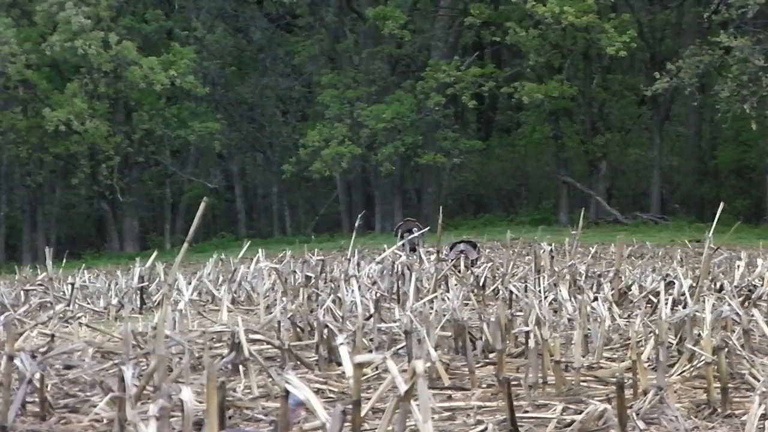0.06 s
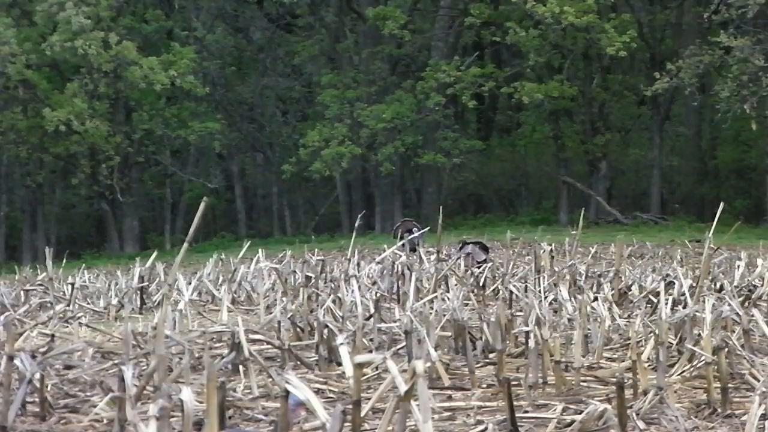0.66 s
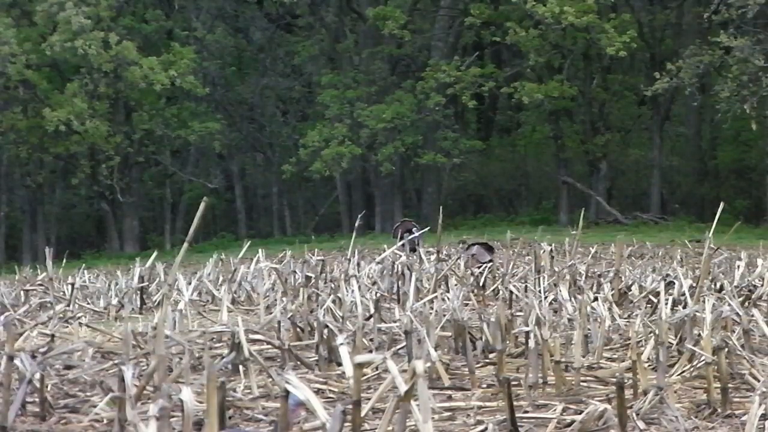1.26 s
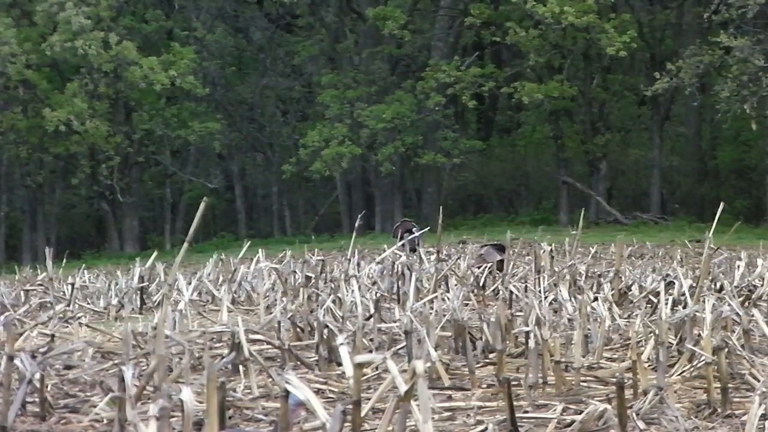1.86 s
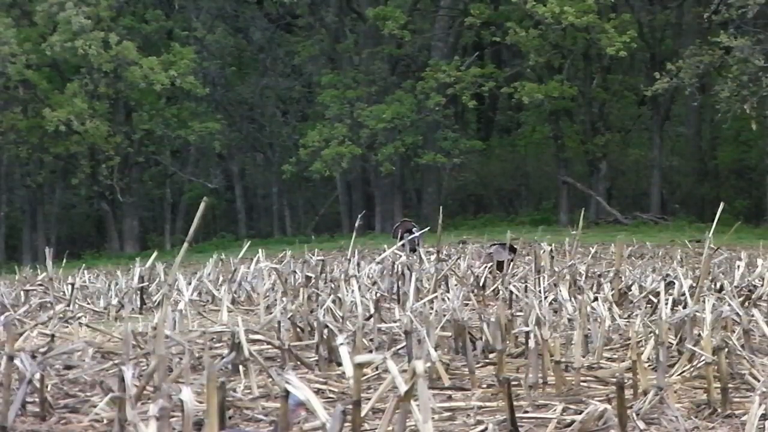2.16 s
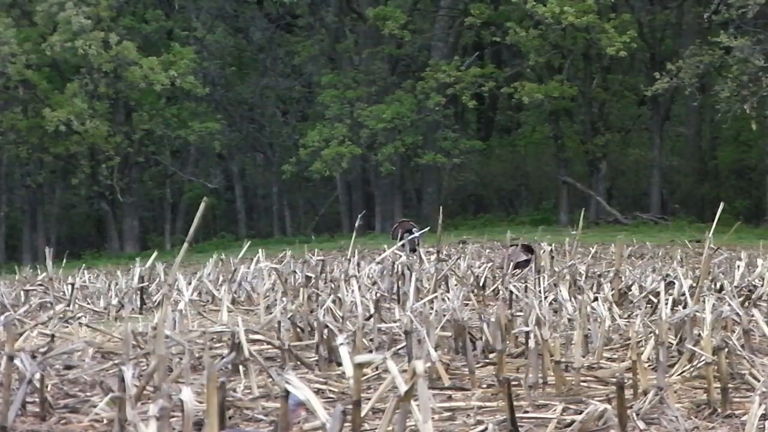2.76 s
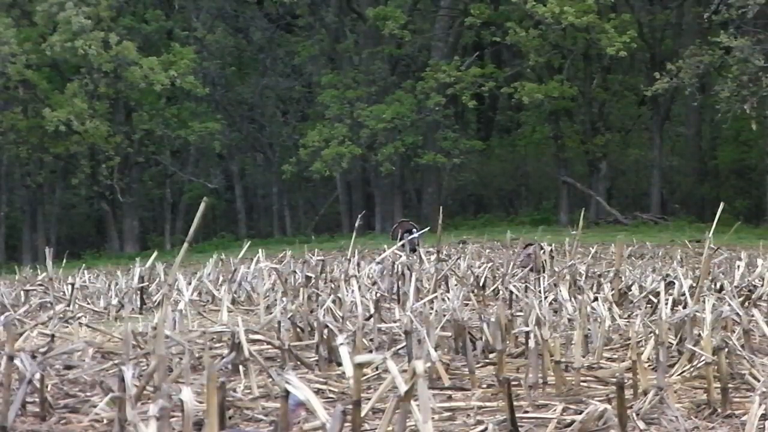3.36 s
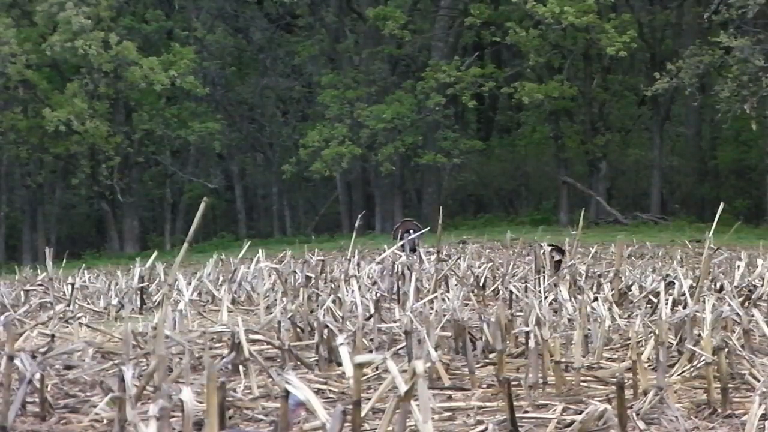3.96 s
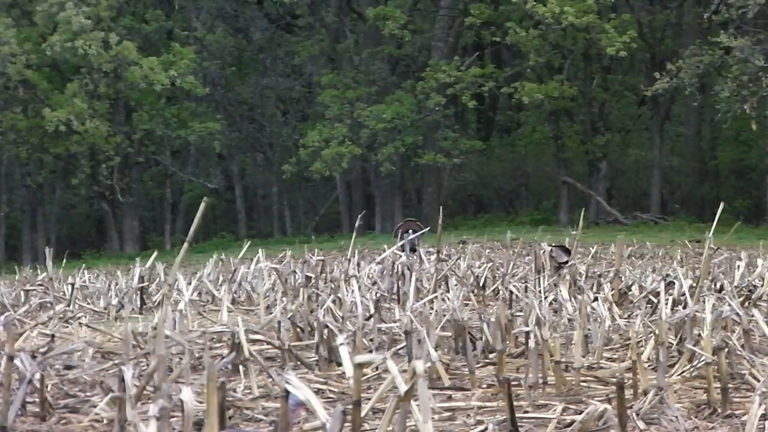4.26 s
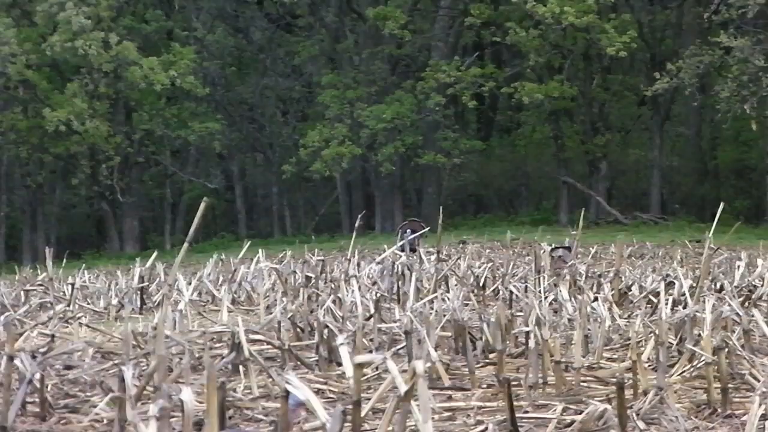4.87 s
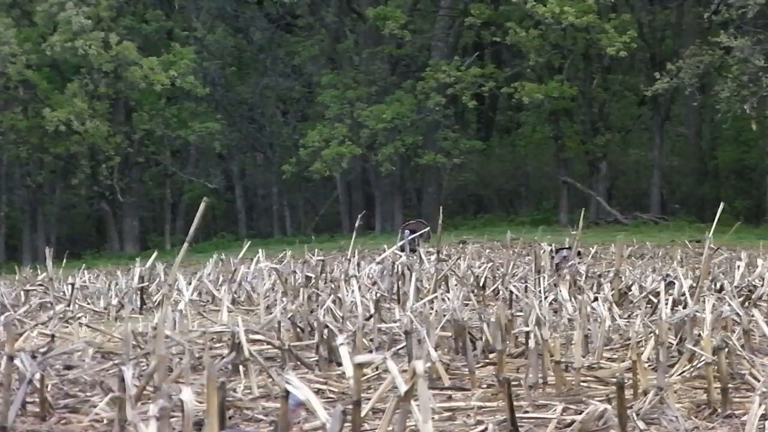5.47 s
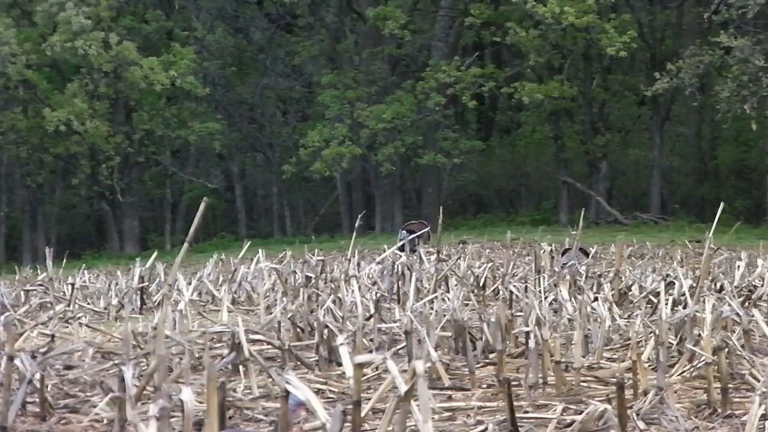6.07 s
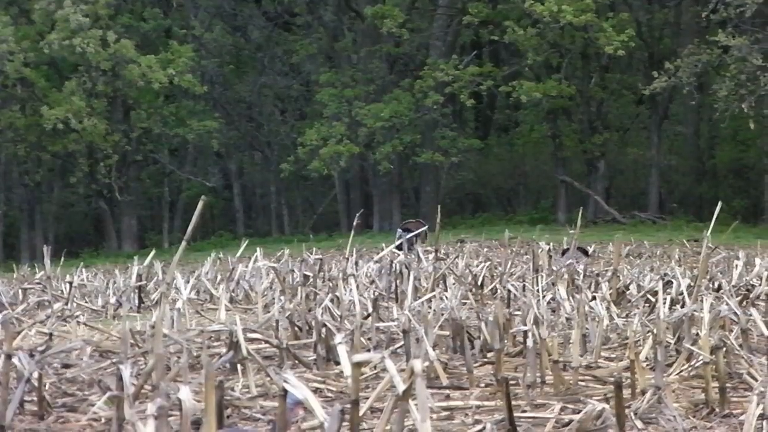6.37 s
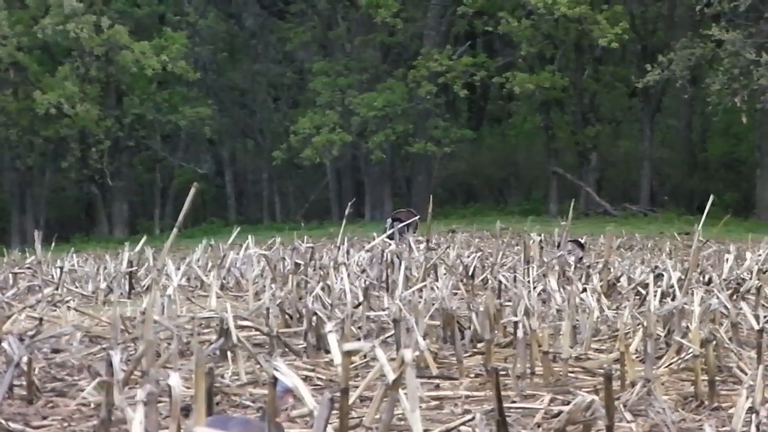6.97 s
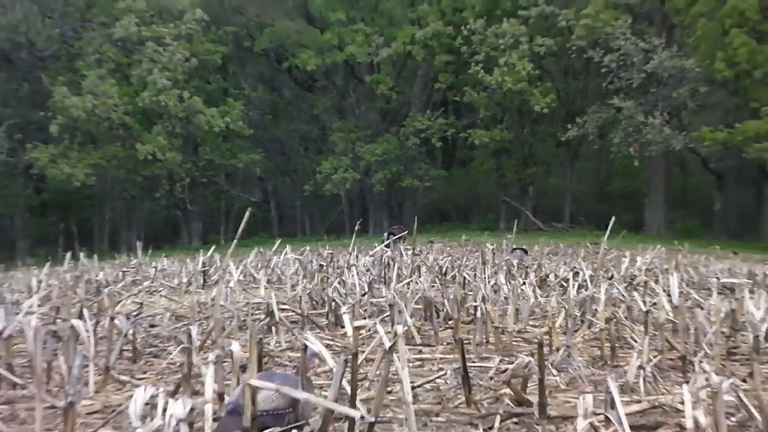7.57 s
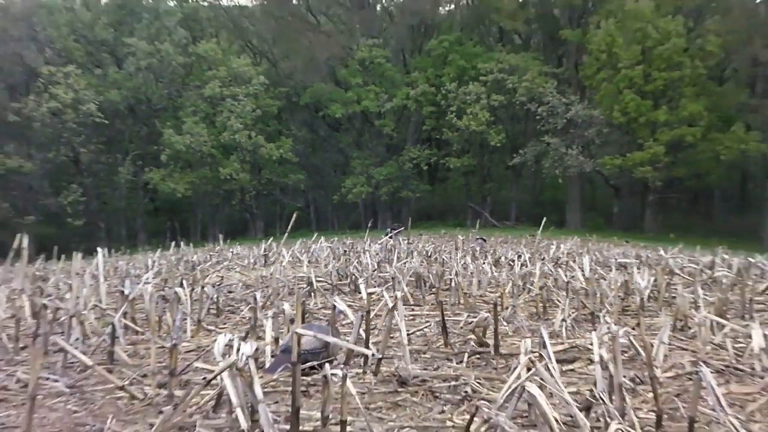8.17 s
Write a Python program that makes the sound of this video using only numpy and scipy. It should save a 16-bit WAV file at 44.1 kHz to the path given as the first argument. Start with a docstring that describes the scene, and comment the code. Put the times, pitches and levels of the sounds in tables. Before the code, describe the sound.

A steady low rumble, distant engine drone and hiss with a faint high whine fill an open field beside a wood. One bird gives a downward whistle and a quick trill, then another sings a run of upward slurs, getting shorter and faster. Fingers briefly tap the camera close to the microphone before the first bird's whistle and trill return. Both songs carry a light woodland echo, with faint peeps from deeper in the trees.

```python
"""A bird at the edge of a wood sings a falling note and a fast trill, twice, heard from a stubble field
in spring. In between, a second bird whistles rising slurs that speed up like a bouncing ball.
The trees echo both, and other birds call from deeper in. Distant engines drone under the rumble of
the countryside. Right at the microphone, the camera hisses, whines and clicks under a finger."""
import sys
import numpy as np
from scipy import signal
from scipy.fft import rfft, irfft
from scipy.io import wavfile
from scipy.ndimage import uniform_filter1d

SR = 44100
rng = np.random.default_rng(int(sys.argv[2]) if len(sys.argv) > 2 else 0)


def bounce(signal):
    """Save signal as a 16-bit WAV file at the path given by the first command-line argument."""
    frames = np.transpose(np.atleast_2d(signal))
    limited = np.clip(frames, -1, 1)
    pcm = np.round(limited * 32767).astype(np.int16)
    wavfile.write(sys.argv[1], SR, pcm)


N = 361911
TIME = np.arange(N) / SR


def from_db(db):
    """Decibels to gain."""
    return 10 ** (np.asarray(db) / 20)


def unit_rms(x):
    """Scale to unit power."""
    return x / np.sqrt(np.mean(x ** 2) + 1e-20)


def ages(length_s):
    """The time in seconds of each sample of a sound."""
    return np.arange(max(int(length_s * SR), 2)) / SR


def envelope(age, attack_s, release_s, depth_db=20):
    """Attack, hold and release of a note, in dB relative to its peak."""
    rising = np.clip(1 - age / attack_s, 0, 1)
    falling = np.clip(1 - (age[-1] - age) / release_s, 0, 1)
    return -depth_db * (rising ** 2 + falling ** 2)


def s_curve(at, centre, width):
    """A smooth step from 0 to 1."""
    return .5 + .5 * np.tanh((at - centre) / width)


def drift(rate_hz):
    """A slow random wander, rms 1."""
    hz = np.arange(N // 2 + 1) * SR / N
    return unit_rms(irfft(rfft(rng.standard_normal(N)) / (1 + (hz / rate_hz) ** 2), N))


def coloured_noise(spectrum):
    """Steady noise of a given colour, rms 1."""
    hz, db = np.transpose(spectrum)
    bins = np.arange(1, N // 2 + 2) * SR / N
    gain = from_db(np.interp(np.log(bins), np.log(hz), db)) * np.minimum(bins / hz[0], 1) ** 2
    return unit_rms(irfft(rfft(rng.standard_normal(N)) * gain, N))


def sine(hz):
    """A pure tone that follows a pitch track."""
    return np.sin(2 * np.pi * (np.cumsum(hz) / SR + rng.random()))


def add(track, start, sound):
    """Mix a sound into a track at a time in seconds."""
    at = max(int(start * SR), 0)
    track[at:at + len(sound)] += sound[:max(N - at, 0)]


# The low end out on the open field. Each row: frequency in Hz, relative spectral level in dB.
RUMBLE_SPECTRUM = [(12, -28), (25, -17), (38, -11), (50, -13), (60, 2.5), (68, 3.5), (80, -0.5), (90, 4),
                   (102, 4.5), (125, -1), (155, -4), (180, -10.5), (250, -16.5), (390, -48)]
# Its slow rise and fall. Each row: time in seconds, gain in dB.
RUMBLE_SWELL = [(0, -1.5), (1.3, -0.5), (2.2, 0), (4.3, 0), (5.6, -0.5), (6.6, -1), (8.2, -1)]
def rumble(level_db=-45.5):
    """The countryside all around: low noise that swells a little and sinks."""
    swell_db = np.interp(TIME, *np.transpose(RUMBLE_SWELL))
    return from_db(level_db + swell_db) * coloured_noise(RUMBLE_SPECTRUM)


# Engines a long way off. Each row: start and end in seconds, first pitch and the pitch it tends to in Hz,
# settling time in seconds, time in seconds from which the drone's level falls away (may lie before
# its start), reference level in dB.
ENGINES = [(1.2, 4.7, 118.4, 96.8, 4.5, 0.76, -45.5), (2.1, 8.2, 91.4, 103.1, 1.6, 7.14, -43)]
def engines(waver=.0063, flutter_db=2.5, fade_db_per_s=3.5):
    """Only the firing tones carry this far; each eases towards a steady speed as it fades in and out."""
    out = np.zeros(N)
    for start, end, first_hz, last_hz, settle_s, fade_from_s, reference_db in ENGINES:
        age = ages(end - start)
        hz = last_hz + (first_hz - last_hz) * np.exp(-age / settle_s)
        hz *= 1 + waver * drift(rate_hz=2.5)[:len(age)]
        db = reference_db - fade_db_per_s * np.abs(start + age - fade_from_s)
        db += envelope(age, attack_s=.3, release_s=.314)
        db -= flutter_db * drift(rate_hz=2.5)[:len(age)]
        add(out, start, np.sqrt(2) * sine(hz) * from_db(db))
    return out


# The noise floor at the microphone. Each row: frequency in Hz, relative spectral level in dB.
HISS_SPECTRUM = [(250, -6), (290, -2), (350, 6), (410, 9.5), (520, 4), (720, 1.5), (1100, -1), (1500, 0),
                 (2000, -0.5), (3400, -0.5), (5000, -1), (9000, -3.5), (9900, -6), (14000, -7)]
def hiss(level_db=-42.24):
    """A steady, broad hiss behind everything."""
    return from_db(level_db) * coloured_noise(HISS_SPECTRUM)


def camera_whine(hz=7867.6, frame_hz=29.97):
    """The camera's thin high tone restarts with every frame, which gives it close sidebands."""
    tone = np.sqrt(2) * from_db(-48.3) * np.sin(2 * np.pi * hz * (TIME % (1 / frame_hz)))
    return signal.sosfilt(signal.butter(1, [6500, 9500], "band", fs=SR, output="sos"), tone)


# Fingers on the camera, right by the microphone. Each row: start in seconds, relative level in dB,
# seconds to die by 60 dB, hardness from 0 to 1.
TOUCHES = [(6.4285, -28, .022, .25), (6.432, -33, .02, .1), (6.4425, -35, .025, .15), (6.52, -23, .005, .9),
           (6.523, -39, .025, .1), (6.543, -33, .06, 0), (6.563, -34, .06, 0), (6.72, -37, .08, 0)]
# The resonances of its shell. Each row: frequency in Hz, width in Hz, relative gain in dB.
SHELL_MODES = [(392, 55, -1), (1015, 22, 9), (1470, 130, 3.5), (2800, 470, 5.5), (3580, 400, -17)]
def handling(soft_hz=1100, hard_hz=35000):
    """Fingers tap and rub the camera shell; a hard contact is bright and cracks, a soft one is dull."""
    push, crack, shell = np.zeros((3, N))
    age = TIME[:SR // 10]
    for start, level_db, t60, hardness in TOUCHES:
        burst = rng.standard_normal(len(age)) * from_db(level_db - 60 * age / t60)
        pole = np.exp(-2 * np.pi * (soft_hz + hardness * hard_hz) / SR)
        dulled = signal.lfilter([(1 - pole) ** 2], [1, -2 * pole, pole ** 2], burst)
        add(push, start, dulled)
        add(crack, start, hardness * burst)
    for k, (hz, width_hz, db) in enumerate(SHELL_MODES):
        ring = signal.lfilter(*signal.iirpeak(hz, hz / width_hz, fs=SR), push + 1e-18)
        shell += (-1) ** k * from_db(db) * ring
    return crack + from_db(12) * shell


def scatter(t60, build_s):
    """Countless small echoes that build up and die away; unit energy."""
    age = TIME[:SR]
    shape = from_db(-60 * age / t60) * (1 - np.exp(-age / build_s))
    return unit_rms(rng.standard_normal(SR) * shape) / np.sqrt(SR)


def wood(song, near_db, far_db, t60):
    """The direct sound, quick echoes off the nearest trunks, then a thin tail from deeper in the wood."""
    trunks = from_db(near_db) * scatter(t60=.081, build_s=.018)
    tail = from_db(far_db) * scatter(t60, build_s=.032)
    return song + signal.fftconvolve(song, trunks + tail)[:N]


def syrinx(hz, db, waver=.009, flutter_db=1.44, wobble_hz=300):
    """A bird's voice on one note: a near sine, a little unsteady, with smooth joins and soft ends."""
    steps = np.arange(len(hz)) / SR * wobble_hz
    knots = rng.standard_normal((2, 200))
    bend, swell = [np.interp(steps, np.arange(len(k)), k) for k in knots]
    soft_ends = np.clip(np.minimum(steps, steps[::-1]), 0, 1)
    hz, db = uniform_filter1d([hz * (1 + waver * bend), db + flutter_db * swell], size=30)
    return sine(hz) * from_db(db) * soft_ends


# Birds deep in the wood, far from the microphone. Each row: start and end in seconds,
# first and last pitch in Hz, relative level in dB.
FAR_CALLS = [(0.253, 0.29, 2200, 2200, -44.5), (.86, 0.944, 3400, 3560, -51),
             (0.911, 0.975, 4780, 4670, -46), (1.158, 1.344, 2700, 2650, -46),
             (1.383, 1.426, 2700, 2300, -48), (1.568, 1.61, 4750, 3950, -44),
             (4.748, 4.794, 3770, 2840, -44), (4.819, 4.836, 3850, 2920, -39),
             (5.86, 5.918, 1610, 1660, -48), (6.016, 6.113, 2450, 3370, -44),
             (6.244, 6.326, 1760, 1640, -43.5), (6.485, 6.516, 2880, 3450, -39),
             (8.083, 8.178, 2700, 2680, -49.5)]
def far_birds(peep_count=8, peep_s=.08, peep_hz=3100, peep_db=-53):
    """Faint glides that swell and fade, with still fainter peeps at random."""
    out = np.zeros(N)
    peeps = []
    for when, pitch, bend in rng.random((peep_count, 3)):
        start = when * N / SR
        hz = peep_hz * 2 ** ((pitch - .5) / 2)
        peeps.append((start, start + peep_s, hz, hz * 2 ** ((bend - .5) / 10), peep_db))
    for start, end, first_hz, last_hz, level_db in FAR_CALLS + peeps:
        along = np.linspace(0, 1, int((end - start) * SR))
        call = syrinx(first_hz + along * (last_hz - first_hz), level_db, waver=.0057)
        add(out, start, call * np.sqrt(4 * along * (1 - along)))
    return out


def slur(length_s, top_hz, level_db, turn=.57, base_hz=2928, low_db=-11):
    """A whistle that grows louder as it rises: nearly straight when long, an S-shaped hook when short."""
    age = ages(length_s)
    along = age / length_s
    straight = min(2.33 * length_s, 1)
    rise = (1 - straight) * s_curve(along, turn, width=1.14 * length_s) + straight * along
    rise = (rise - rise[0]) / (rise[-1] - rise[0])
    scoop = 130 * np.exp(-age / .011)   # the note starts and ends a little flat
    droop = 90 * np.exp((age - length_s) / .0087)
    hz = base_hz + rise * (top_hz - base_hz) - (1 - straight) * (scoop + droop)
    db = level_db + low_db * (1 - rise)
    db += envelope(age, attack_s=.15 * length_s, release_s=.088 * length_s, depth_db=6.5)
    return syrinx(hz, db, waver=.003)


# The second bird's slow opening, at the wood's edge. Each row: start and end in seconds, top pitch in Hz,
# level in dB, steepest point as a share of the note.
OPENING_SLURS = [(2.581, 2.915, 3400, -34, 0.36), (2.999, 3.305, 3443, -30.5, 0.37),
                 (3.392, 3.633, 3430, -28.5, 0.39), (3.724, 3.875, 3570, -28.5, 0.65)]
def opening_slurs():
    """Four rising whistles, each shorter than the one before."""
    out = np.zeros(N)
    for start, end, top_hz, level_db, turn in OPENING_SLURS:
        add(out, start, slur(end - start, top_hz, level_db, turn))
    return out


def bouncing_run(start_s=3.8763, notes=15, shortest_s=.0928, excess_s=.0519, keeps=.76, sung_share=.78):
    """The slurs speed up like a bouncing ball and reach higher, under one swell of loudness."""
    out = np.zeros(N)
    slow_top_hz, fast_top_hz = 3624, 3943
    peak_s, peak_db, fade_db_per_s2 = 4.66, -28, 8
    slack = keeps ** np.arange(notes)   # each period keeps a share of its excess over the shortest
    periods = shortest_s + excess_s * slack
    ends = start_s + np.cumsum(periods)
    sharper, softer = rng.standard_normal((notes, 2)).T
    tops = fast_top_hz + (slow_top_hz - fast_top_hz) * slack + 15 * sharper
    levels = peak_db - fade_db_per_s2 * (ends - peak_s) ** 2 - .06 * softer
    for end, length_s, top_hz, level_db in zip(ends, sung_share * periods, tops, levels):
        add(out, end - length_s, slur(length_s, top_hz, level_db))
    return out


# The main bird announces each trill from the edge of the wood. Each row: start in seconds,
# length as a share of the full note, level in dB.
FALLING_NOTES = [(1.463, .8, -28.5), (6.803, 0.92, -27.5)]
def falling_notes(full_s=.41, top_hz=3147, end_hz=1987):
    """A loud slide down that ends in a soft held tone."""
    out = np.zeros(N)
    for start, share, level_db in FALLING_NOTES:
        age = ages(full_s * share) / share   # a shorter note runs through the same shape faster
        hz = top_hz + (end_hz - top_hz) * s_curve(age, centre=.041, width=.0174)
        slide_db = -380 * np.maximum(age - .035, 0)
        held_db = -14.5 - 26 * age
        db = np.maximum(slide_db, held_db) + envelope(age, attack_s=.03, release_s=.02, depth_db=29)
        add(out, start, syrinx(hz, db + level_db))
    return out


def dive(length_s=.042, top_hz=7000, end_hz=5250, swell_db_per_s=560, peak_db=3):
    """Pitch and level of a high whistle that swells as it dives."""
    age = ages(length_s)
    hz = top_hz + (end_hz - top_hz) * (age / length_s) ** 3.8
    return hz, peak_db + swell_db_per_s * (age - length_s)


def up_sweep(tone_hz, length_s=.022, above_hz=200, rise_hz=1500, bend_s=.0065, level_db=-4):
    """Pitch and level of a whistle that swells and curls upward."""
    age = ages(length_s)
    hz = tone_hz + above_hz + rise_hz * np.exp((age - length_s) / bend_s)
    return hz, level_db + envelope(age, attack_s=.022, release_s=.0029, depth_db=22.5)


def flick(lead_s, tail_s=.0038, centre_hz=3265, swing_hz=544, cycle_s=.0058, slope_db_per_s=600):
    """Pitch and level of a very fast swing up and down, loudest at its last crest."""
    from_crest = ages(lead_s + tail_s) - lead_s
    hz = centre_hz + swing_hz * np.cos(2 * np.pi * from_crest / cycle_s)
    return hz, -6.5 - slope_db_per_s * np.abs(from_crest)


def held_tone(tone_hz, length_s, sag_db_per_s, overshoot_hz=230, settle_s=.011, release_s=.011):
    """Pitch and level of a short tone that sags onto its pitch and dies."""
    age = ages(length_s)
    dying = np.clip(1 - (length_s - age) / release_s, 0, 1)
    return tone_hz + overshoot_hz * np.exp(-age / settle_s), -sag_db_per_s * age - 17 * dying ** 2


# The main bird's trills, carrying over the stubble to the microphone. Each row: time of the first flick
# in seconds, number of syllables after the opening, level in dB.
TRILLS = [(1.9010, 11, -26), (7.2415, 10, -25)]
def trills(syllable_s=.0619, settled_hz=3215, sharp_hz=224, settle_s=.085, peak_s=.17, fade_db_per_s2=34):
    """A high dive into sixteen syllables a second, each an up-sweep, a flick and a tone."""
    out = np.zeros(N)
    dive_lead_s, opening_lead_s, flick_lead_s = .0525, .0085, .004   # ahead of the flick's crest
    linger_s = .0017   # the long opening tone holds up the next syllable
    for start, syllables, level_db in TRILLS:
        hz, db = dive()
        add(out, start - dive_lead_s, syrinx(hz, db + level_db))
        opening_tone = held_tone(settled_hz + sharp_hz, length_s=.039, sag_db_per_s=100)
        hz, db = np.hstack([flick(opening_lead_s), opening_tone])
        add(out, start - opening_lead_s, syrinx(hz, db + level_db + .8))
        for k in range(1, syllables + 1):
            since = k * syllable_s + linger_s * (k == 1)
            tone_hz = settled_hz + sharp_hz * np.exp(-since / settle_s)
            effort_db = level_db - fade_db_per_s2 * (since - peak_s) ** 2
            sweep = up_sweep(tone_hz)
            tone = held_tone(tone_hz, length_s=.03, sag_db_per_s=361)
            hz, db = np.hstack([sweep, flick(flick_lead_s), tone])
            onset = start + since - len(sweep[0]) / SR - flick_lead_s
            add(out, onset, syrinx(hz, db + effort_db, waver=.0098, flutter_db=4.2))
    return out


def scene():
    """One microphone in the field: birds echoing in the wood, the camera and the steady background."""
    triller = wood(falling_notes() + trills(), near_db=-11, far_db=-11.5, t60=1.0)
    whistler = wood(opening_slurs() + bouncing_run(), near_db=-12, far_db=-23, t60=.75)
    distant = from_db(-5.5) * wood(far_birds(), near_db=4, far_db=-10, t60=.6)
    background = rumble() + hiss() + handling() + engines() + camera_whine()
    return (triller + whistler + distant + background)[None]


def record(dry, cutoff_hz=13900):
    """The highest treble is cut steeply."""
    hz = np.arange(N // 2 + 1) * SR / N
    return irfft(rfft(dry) / np.sqrt(1 + (hz / cutoff_hz) ** 400), N)


dry = scene()
out = record(dry)
bounce(out)
```